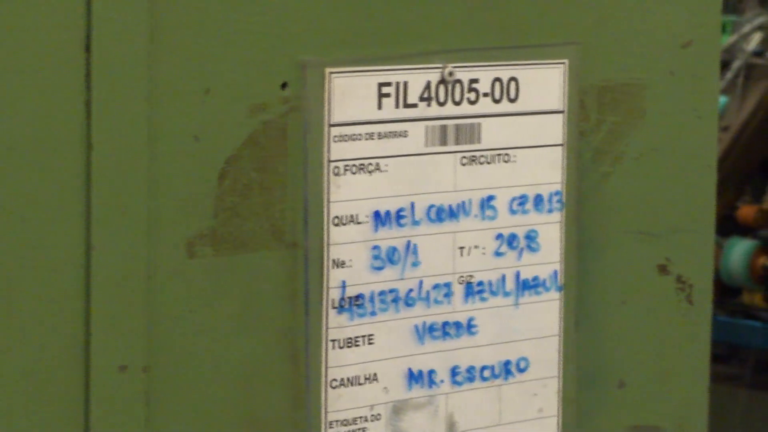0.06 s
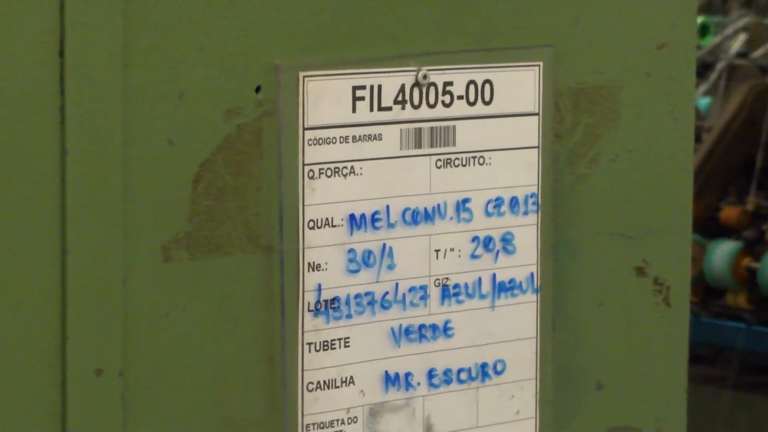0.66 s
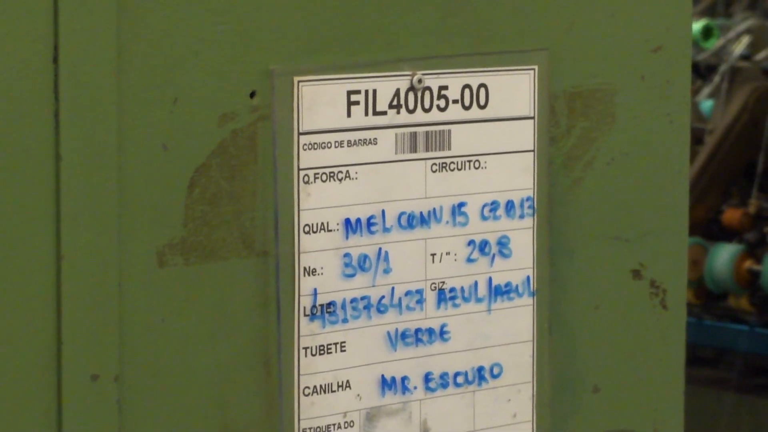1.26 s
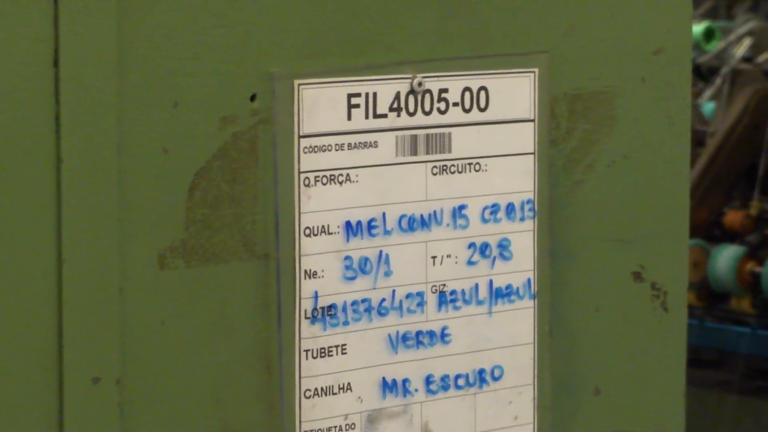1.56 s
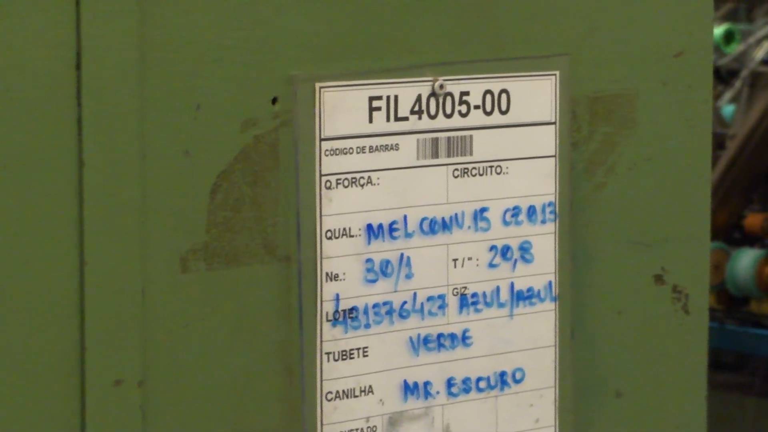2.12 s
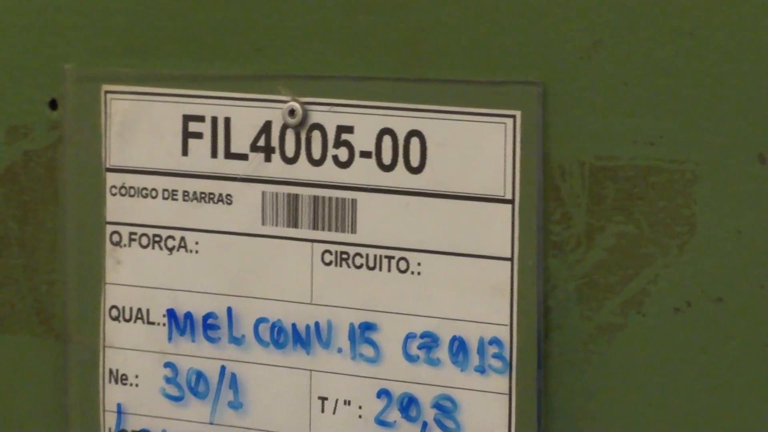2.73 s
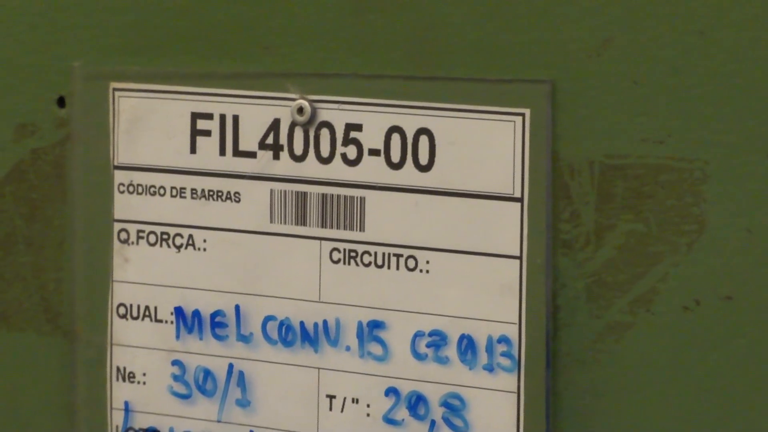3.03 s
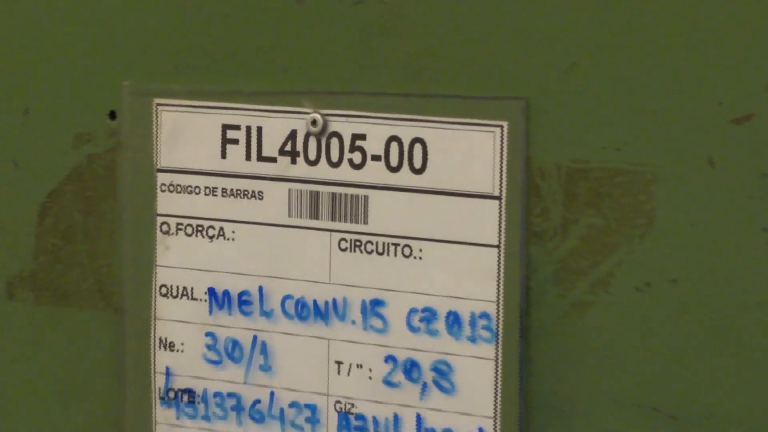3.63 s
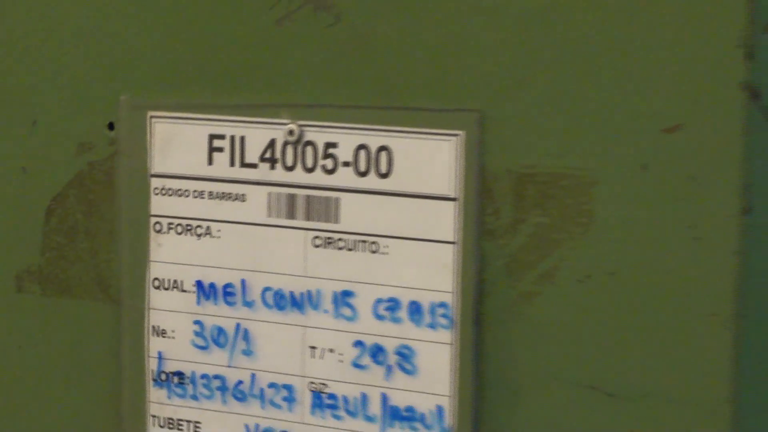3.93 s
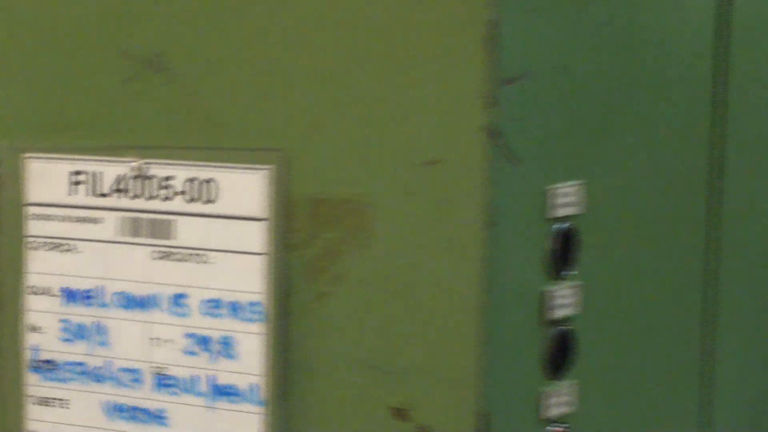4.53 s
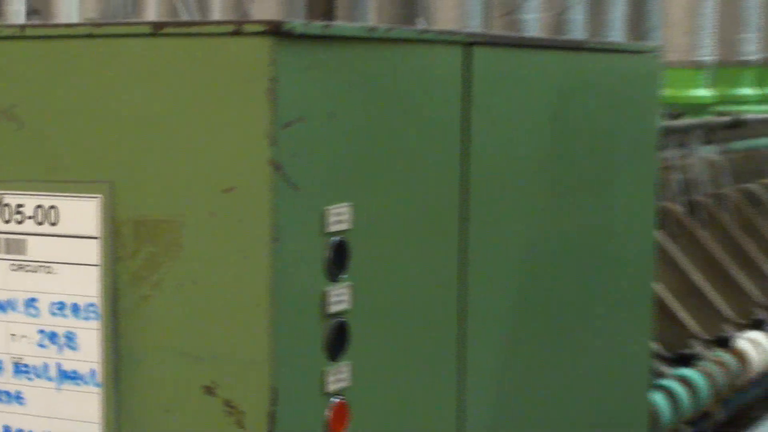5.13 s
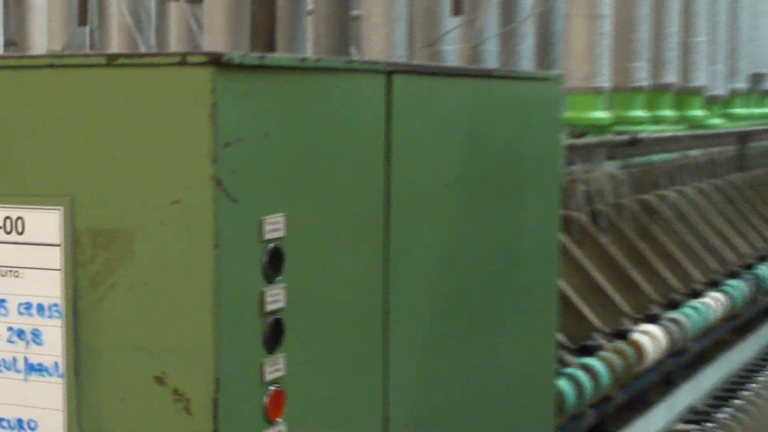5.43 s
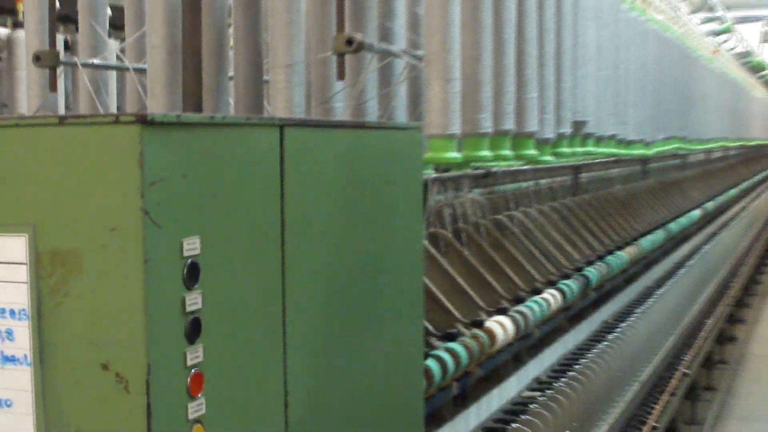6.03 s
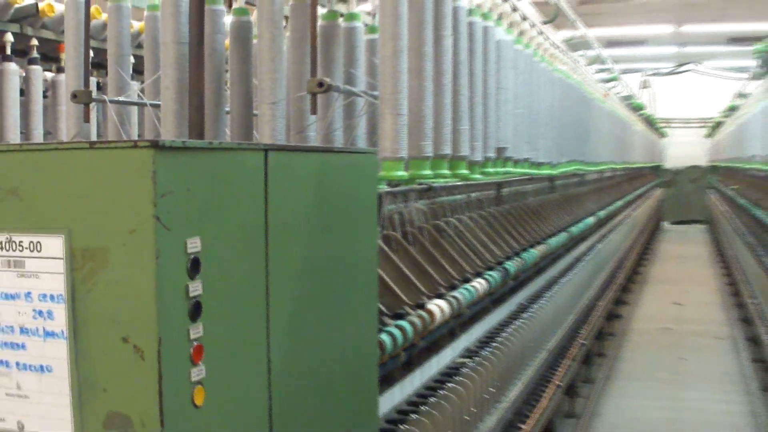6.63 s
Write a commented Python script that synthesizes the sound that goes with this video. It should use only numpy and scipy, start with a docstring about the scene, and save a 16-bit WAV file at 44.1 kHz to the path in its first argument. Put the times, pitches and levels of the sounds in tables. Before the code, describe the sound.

From the start, many spinning machines run together in a large factory hall, heard from beside one of them as a loud, dense, diffuse roar. Banks of spindles drone inside it at slightly different speeds, beating against each other. The closest stand out as clean, low whines that swell and fade every second or so, giving a gentle throb. Motors, fans and belts hum underneath, and a thin, bright hiss of yarn running through metal rings flickers on top, lifting slightly around 1.4 seconds. At about 1.9 seconds the whole sound drops out for an instant, comes back noticeably louder, and settles to its earlier level by about 2.1 seconds. From there the roar, drone and hiss continue evenly, with only the whines shifting in strength, until the end at nearly 7 seconds.

```python
"""A large spinning hall, beside the end cabinet of one ring frame.
Banks of spindles drone at slightly different speeds, the closest as clean whines, and travellers hiss
on their rings. Motors, fans and belts hum underneath, in the diffuse roar of the hall.
The camera's notch filters hollow out the treble. Once the sound drops out and comes back briefly louder."""
import sys
import numpy as np
from scipy import signal
from scipy.fft import rfft, irfft, next_fast_len
from scipy.io import wavfile
from scipy.ndimage import uniform_filter1d, map_coordinates

SR = 44100
rng = np.random.default_rng(int(sys.argv[2]) if len(sys.argv) > 2 else 0)


def wrap_up_sound(samples):
    """Save the sound to the file named by the first command line argument, as 16-bit audio."""
    columns = np.atleast_2d(samples).T
    # keep every value between -1 and 1, then stretch to whole-number steps
    tamed = np.clip(columns, -1, 1)
    steps = np.round(tamed * 32767).astype(np.int16)
    wavfile.write(sys.argv[1], SR, steps)


N = 298557


def spindles(slip, port_phase, count):
    """Each unbalanced bobbin sounds its turning rate and overtones; neighbours beat against each other."""
    # banks on one drive: turning rate/Hz, spread/share of rate, level/dB of harmonics 1, 2, 3
    banks = [(243.6, .022, -40.5, -37, -37), (256.1, .016, -40.5, -39, -39.5), (227, .028, -45.5, -37, -44)]
    drone = np.zeros((2, N))
    for speed_hz, spread, *harmonics_db in banks:
        for offset in np.linspace(-1, 1, count) + rng.uniform(-1, 1, count) / count:
            # the belt slips a little, so the pitch wavers
            turning_hz = speed_hz * (1 + spread * offset + slip * wobble(3))
            angle = 2 * np.pi * np.cumsum(turning_hz) / SR
            for harmonic, db in enumerate(harmonics_db, 1):
                phase = arrival_phase(port_phase)
                drone += amp(db) * np.sqrt(2 / count) * np.sin(harmonic * angle + phase)
    return drone


def near_spindles(port_phase):
    """The closest spindles hold their speed and stand out as clean whines; together they throb."""
    # spindle whines: turning rate/Hz, harmonic, [(t/s, level/dB)]
    whines = [ (220.3, 1, [(0, -44), (6.7, -45)]), (233.6, 2, [(1.5, -40), (5, -48)]),
              (236.1, 1, [(.8, -56), (1.4, -43), (5.3, -37.5), (6.7, -38)]), (239.7, 1, [(.9, -37.5),
              (3, -38), (4, -56)]), (240, 2, [(1.2, -31), (2.7, -44), (4.1, -31.5), (4.7, -37.5),
              (6.7, -37)]), (239.7, 3, [(2.4, -52), (3, -38.5), (5.2, -36.5), (6.7, -46)]),
              (244.5, 3, [(3.6, -45), (4.8, -34), (5.8, -48)]), (247, 1, [(1.4, -37), (2.2, -34),
              (3.3, -35), (4.1, -38), (6.3, -33)]), (246.7, 2, [(1.6, -38), (2.6, -32), (4.1, -46),
              (4.6, -31.5), (5.4, -33), (6.7, -37)]), (246.5, 3, [(.7, -33), (1.4, -40), (2.05, -28),
              (3.1, -48), (4.1, -31), (6.2, -36)]), (250.9, 1, [(1.6, -42), (2.8, -38.5), (6.7, -42)]),
              (256, 2, [(1.5, -42), (2.7, -35), (4.1, -41), (5.4, -32), (6.2, -41)]), ]
    return sum(whine(harmonic * hz, levels, port_phase) for hz, harmonic, levels in whines)


def traveller_hiss(level_db):
    """Travellers and yarn slide on the rings: a bright hiss that drifts slowly and flickers fast."""
    # sliding noise: f/Hz, relative level/dB
    spectrum = [(1000, -39), (3000, -18), (4600, -14.5), (5800, -1.5), (7200, 0.5), (8400, 3.5),
                (10000, 0.5), (11200, 0), (14500, -17.5), (15700, -9.5)]
    drift_db = 0.12 * wobble(5.1)
    shimmer_db = 0.45 * wobble(40)
    return amp(level_db + drift_db + shimmer_db) * rush(spectrum, patchy_db=1.0)


def near_motors(port_phase):
    """The nearest motors each hum on one clean tone."""
    # motor tones: f/Hz, [(t/s, level/dB)]
    tones = [ (157.2, [(1.4, -51), (2.2, -44), (2.9, -50), (3.6, -45), (4.4, -47.5), (5.9, -41),
             (6.5, -49)]), (301.4, [(.6, -35.5), (1.4, -43), (2.2, -39.5), (3.1, -37), (4.4, -41),
             (5.5, -34.5), (6.2, -45)]), ]
    return sum(whine(hz, levels, port_phase) for hz, levels in tones)


def drive_hum():
    """Many like motors, fans and belts hum, swelling and fading as they drift in and out of step."""
    # hum bands: f/Hz, width/Hz, level/dB
    bands = [(117.4, 6, -59.5), (148.4, 5, -49), (157, 4.6, -54), (204.4, 6, -50.5), (304, 8, -47),
             (374.4, 10, -41)]
    t = np.arange(N) / SR
    hum = np.zeros(N)
    for hz, width, db in bands:
        angle = 2 * np.pi * hz * t
        band = wobble(2 * width) * np.cos(angle) + wobble(2 * width) * np.sin(angle)
        hum += amp(db) * unit(band)
    return hum


def hall_roar(level_db):
    """Frames running at constant speed fill the hall with a diffuse midrange bed."""
    # the hall's roar: f/Hz, relative level/dB
    spectrum = [(25, -42), (85, -32), (120, -21), (190, -11.5), (250, -5.5), (350, 0), (420, -4),
                (560, 0.5), (1400, 1), (1900, -2), (2500, -14.5), (2900, -31), (5000, -44.5), (16000, -70)]
    return amp(level_db) * rush(spectrum, patchy_db=0.42)


def swells():
    """Slight lifts of the hiss and of the roar, in dB, each one smooth arch."""
    # swells: crest t/s, length/s, hiss lift/dB, roar lift/dB
    arches = [(0.073, 0.38, 0.6, 1.3), (.45, .16, 1.3, 0), (1.43, 0.2, 2.1, 0.8), (1.988, 0.18, 1.2, 0.8),
              (3.9, 0.97, 0.8, .3), (4.9, 1, 0.8, 0.2), (6.69, .16, 1.3, 0.5)]
    return sum(np.outer(lifts_db, np.sin(np.pi * ramp(crest - length / 2, length)) ** 2)
               for crest, length, *lifts_db in arches)


def whine(hz, levels, port_phase):
    """A clean tone that swells and fades as the camera moves through the hall's standing waves."""
    t = np.arange(N) / SR
    envelope = amp(np.interp(t, *np.transpose(levels)))
    return envelope * np.sqrt(2) * np.sin(2 * np.pi * hz * t + arrival_phase(port_phase))


def arrival_phase(port_phase):
    """Each wave meets the two microphone ports from its own direction; port_phase is the scatter in rad."""
    return rng.uniform(0, 2 * np.pi) + port_phase * rng.standard_normal((2, 1))


def rush(spectrum, patchy_db):
    """Diffuse stereo noise with patches of random gain, widest in the treble; its mid has rms 1."""
    # likeness of the two microphone ports: f/Hz, left-right correlation
    likeness = [(60, 0.94), (300, 0.97), (700, 0.97), (1300, 0.94), (2400, 0.87), (4400, 1), (5800, 0.66),
                (8100, 0.24), (10000, 0.11), (15000, -0.21)]

    def mid_side_gains(hz):
        """Colour the noise and share it between mid and side."""
        width = np.arccos(np.clip(along(likeness, hz), -1, 1)) / 2
        return amp(along(spectrum, hz)) * [np.cos(width), np.sin(width)]

    cells = signal.stft(rng.standard_normal((2, N)), nperseg=1024)[2]
    patches = uniform_filter1d(rng.standard_normal(cells.shape[1:]), size=5, axis=0)  # across frequency
    patches = uniform_filter1d(patches, size=8, axis=1)  # across time
    noise = signal.istft(cells * amp(patchy_db * unit(patches)), nperseg=1024)[1][:, :N]
    mid, side = filtered(noise, mid_side_gains)
    return np.array([mid + side, mid - side]) / np.std(mid)


def dropout():
    """Gain that dips into a brief gap, comes back too high, holds and settles."""
    gap_s, return_s, fade_s, gap_db = 1.86, 1.871, 0.012, -36
    settled_s, release_s, surge_db = 2.12, 0.022, 4.0
    comeback = ramp(return_s, fade_s)
    gap = ramp(gap_s - fade_s, fade_s) - comeback
    surge = comeback - ramp(settled_s - release_s, release_s)
    return (1 - gap + gap * amp(gap_db)) * amp(surge_db * surge)


def amp(db):
    """Decibels to gain."""
    return 10 ** (np.asarray(db) / 20)


def unit(x):
    """Scale to rms 1."""
    return x / np.sqrt(np.mean(x ** 2) + 1e-20)


def along(points, hz):
    """Read a curve of (f/Hz, value) points on a log frequency axis."""
    freqs, values = np.transpose(points)
    return np.interp(np.log(hz + 1), np.log(freqs + 1), values)


def ramp(start_s, length_s):
    """Straight rise from 0 to 1."""
    return np.clip((np.arange(N) / SR - start_s) / length_s, 0, 1)


def wobble(rate):
    """A smooth random curve, rate knots a second."""
    steps = np.arange(0, N + 64, 64)
    knots = rng.standard_normal(1024)
    curve = map_coordinates(knots, [steps * rate / SR], mode="wrap")
    return np.interp(np.arange(N), steps, curve)


def filtered(x, response):
    """Equalise x by response(hz), a gain for each frequency."""
    size = next_fast_len(N + SR // 2)
    hz = np.fft.rfftfreq(size, 1 / SR)
    return irfft(rfft(x, size) * response(hz), size)[..., :N]


def scene():
    """Spindles and drives stand in the roar of the hall, with the rings hissing on top."""
    # the bass leans left, to the cabinet's side: f/Hz, left minus right level/dB
    balance = [(60, -1), (150, 1.8), (400, 1.5), (1300, 0), (8000, 0.1)]
    hiss_db, roar_db = -32, -16.5
    hiss_flutter_db, roar_flutter_db = 0.33, 0.06
    flutter = wobble(20)  # quick unsteadiness shared by hiss and roar
    hiss_swell_db, roar_swell_db = swells()
    hiss = traveller_hiss(hiss_db + hiss_swell_db + hiss_flutter_db * flutter)
    roar = hall_roar(roar_db + roar_swell_db + roar_flutter_db * flutter)
    drone = spindles(slip=0.00308, port_phase=0.074, count=7)
    whines = near_spindles(port_phase=0.11)
    hum = near_motors(port_phase=0.05) + drive_hum()
    mix = drone + whines + hiss + hum + roar
    return filtered(mix, lambda hz: amp(np.outer([0.5, -0.5], along(balance, hz))))


def record(dry):
    """The level lurches once, peaks are softly rounded, and the treble is notched and band-limited."""
    # the camera's notch filters: f/Hz, width/Hz
    notches = [(3020, 157), (4020, 264), (5000, 353), (12800, 4280)]
    ceiling, top_hz = 1.1, 15750

    def treble_cuts(hz):
        """Flat-bottomed notches under a hard top edge."""
        cuts = [(hz - centre) ** 4 / ((hz - centre) ** 4 + (width / 2) ** 4) for centre, width in notches]
        return np.prod(cuts, axis=0) * (hz < top_hz)

    sound = dry * dropout()
    rounded = sound / (1 + np.abs(sound / ceiling) ** 4) ** (1 / 4)
    return filtered(rounded, treble_cuts)


dry = scene()
out = record(dry)
wrap_up_sound(out)
```